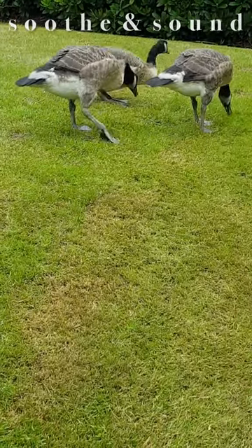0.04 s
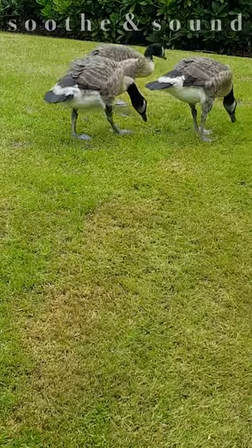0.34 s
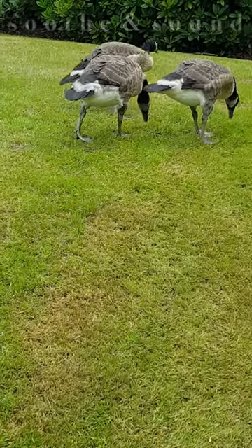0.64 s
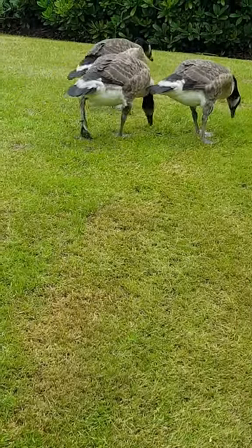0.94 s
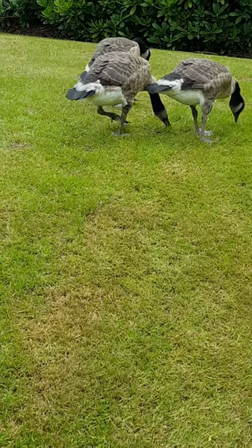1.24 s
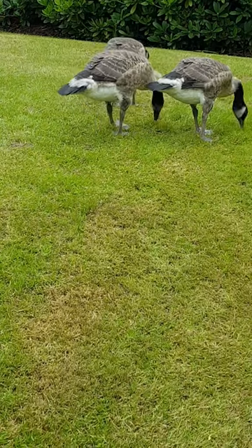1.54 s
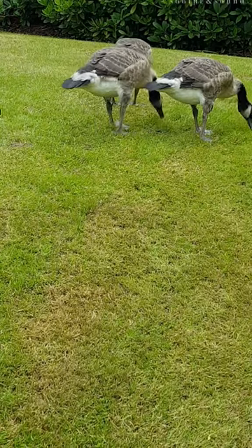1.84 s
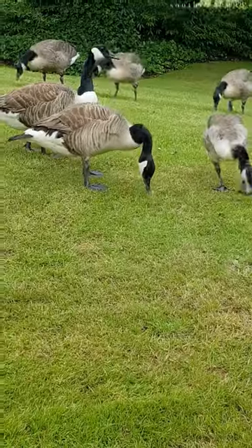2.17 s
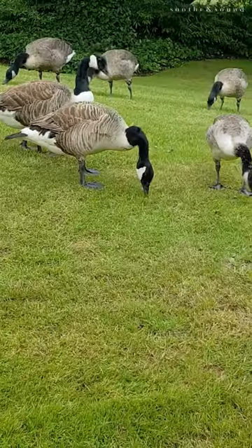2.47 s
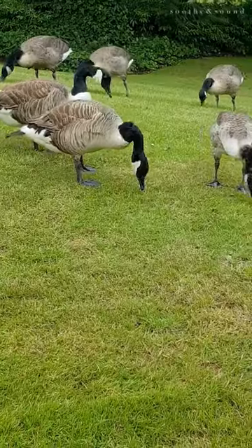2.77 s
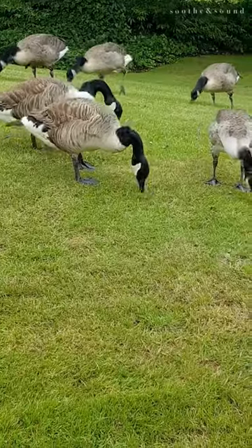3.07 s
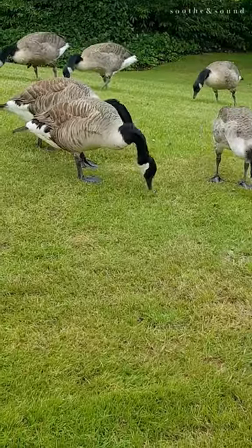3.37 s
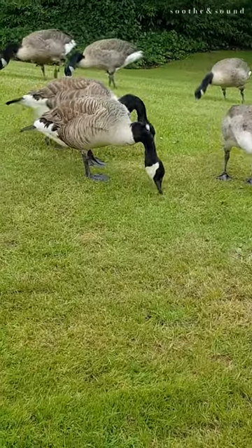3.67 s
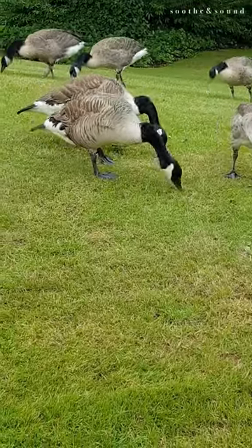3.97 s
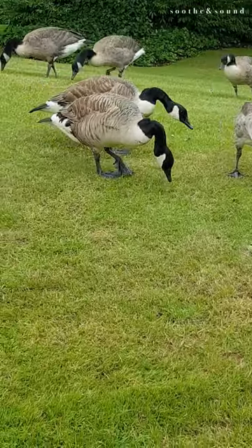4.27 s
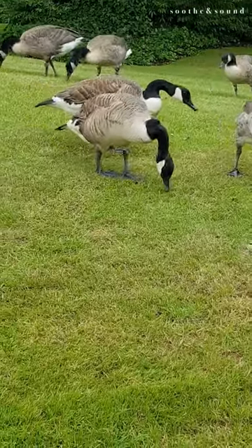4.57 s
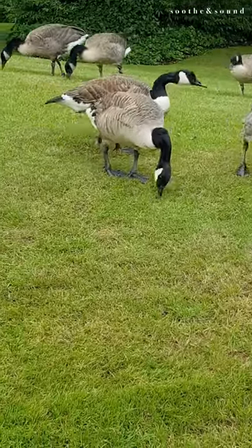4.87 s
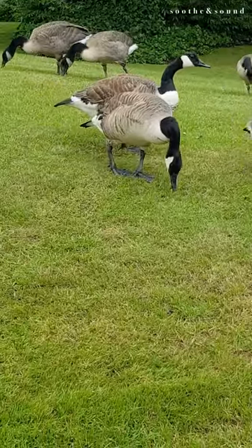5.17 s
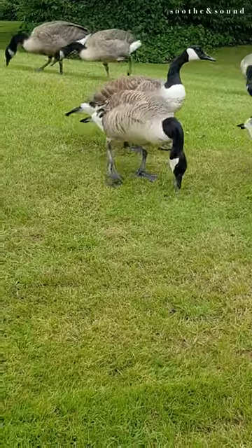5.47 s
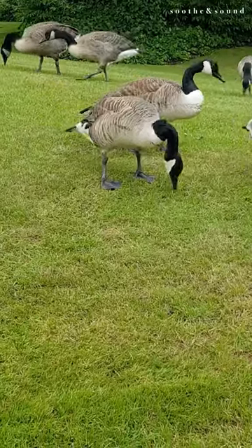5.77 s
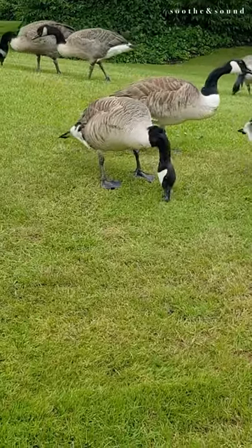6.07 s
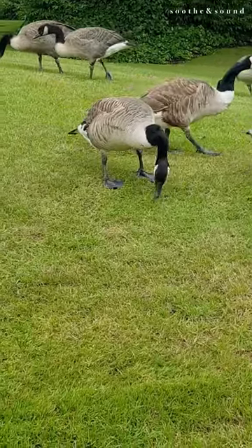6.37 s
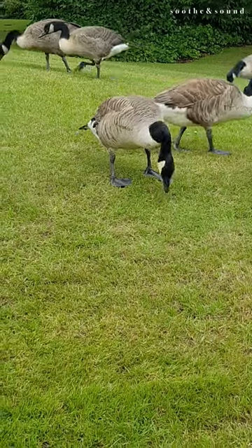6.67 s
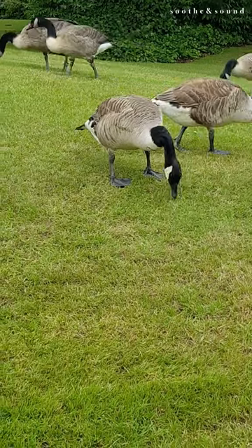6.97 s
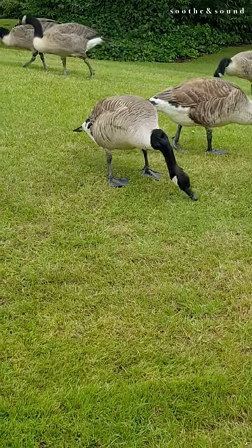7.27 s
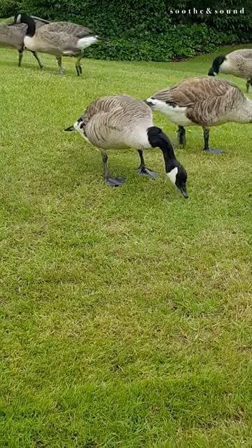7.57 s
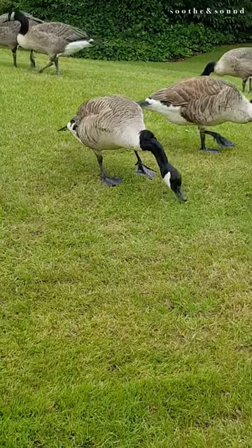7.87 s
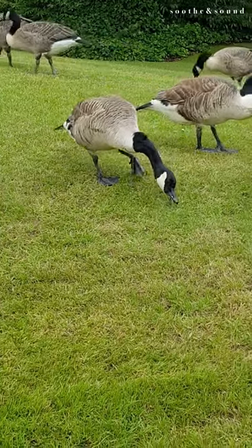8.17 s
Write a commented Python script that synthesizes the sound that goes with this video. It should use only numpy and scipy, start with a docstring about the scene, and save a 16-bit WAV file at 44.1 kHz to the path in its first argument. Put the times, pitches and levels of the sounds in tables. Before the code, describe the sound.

A soft, steady hiss of breeze in leaves fills an open lawn. Geese graze close by, tearing grass in brief, crisp bursts of tiny snaps over a faint crackle of nibbling. A distant songbird whistles a quiet phrase, and around the middle a small bird on the right gives a run of thin, high chirps, the loudest sound. The hiss then eases slightly. Everything is bright, with little bass.

```python
"""Geese graze on a lawn: bills tear the short grass in bursts of tiny snaps, feet pat the turf.
A breeze in the leaves makes a soft, steady hiss over a faint distant rush and rumble.
A small bird close by on the right gives a run of thin chirps; a songbird whistles far off among
the trees. Each bird note is one gliding tone. The sound is thin in the bass, bright in the treble."""
import sys
import numpy as np
from scipy import signal
from scipy.fft import rfft, irfft, next_fast_len
from scipy.io import wavfile
from scipy.ndimage import uniform_filter1d, map_coordinates

SR = 44100
rng = np.random.default_rng(int(sys.argv[2]) if len(sys.argv) > 2 else 0)


def file_out(sig):
    """Save sig as 16-bit WAV at sys.argv[1]."""
    # one column per channel
    cols = np.atleast_2d(sig).T
    # limit, then scale
    lim = np.clip(cols, -1, 1)
    pcm = np.round(lim * 32767).astype(np.int16)
    wavfile.write(sys.argv[1], SR, pcm)


N = 362924
SIDE = np.array([[.5], [-.5]])  # splits a left-minus-right difference between the channels


def amp(db):
    """Decibels to gain."""
    return 10 ** (np.asarray(db) / 20)


def unit(x):
    """Scale to rms 1."""
    return x / np.sqrt(np.mean(x ** 2) + 1e-20)


def along(points, hz):
    """Interpolate (frequency [Hz], value) points on a log axis."""
    knots_hz, values = np.transpose(points)
    return np.interp(np.log(hz + 1), np.log(knots_hz + 1), values)


def curve(points):
    """Interpolate (time [s], value) points at every sample."""
    return np.interp(np.arange(N) / SR, *np.transpose(points))


def progress(length_s):
    """Ramp from 0 to 1."""
    return np.linspace(0, 1, int(length_s * SR))


def wobble(rate_hz):
    """Smooth random curve, rate_hz knots a second."""
    knots = rng.standard_normal(int(N * rate_hz / SR) + 4)
    return map_coordinates(knots, [np.arange(N) * rate_hz / SR])


def filtered(x, response):
    """Apply a frequency response."""
    size = next_fast_len(N + SR // 4)
    return irfft(rfft(x, size) * response(np.fft.rfftfreq(size, 1 / SR)), size)[..., :N]


def add(track, start_s, sound):
    """Mix a sound into a track."""
    part = track[..., max(round(start_s * SR), 0):][..., :sound.shape[-1]]
    part += sound[..., :part.shape[-1]]


# Ambient field at the microphones: (frequency [Hz], left-right correlation [-1..1])
COHERENCE = [(60, -0.13), (130, 0.042), (300, 0.7), (650, 0.56), (1100, 0.17), (1500, -.15), (1900, -.33),
             (2500, -0.25), (3000, 0.076), (7000, -0.0014), (15000, .01)]


def diffuse_noise(spectrum, patchy_db):
    """Partly correlated stereo noise of rms 1; its gain varies in patches of time and frequency."""
    def mid_side_gains(hz):
        angle = np.arccos(np.clip(along(COHERENCE, hz), -1, 1)) / 2
        return amp(along(spectrum, hz)) * [np.cos(angle), np.sin(angle)]

    bins = signal.stft(rng.standard_normal((2, N)), nperseg=512)[2]
    patches = uniform_filter1d(rng.standard_normal(bins.shape[1:]), size=10, axis=0)
    patches = uniform_filter1d(patches, size=10, axis=1)
    pair = signal.istft(bins * amp(patchy_db * unit(patches)), nperseg=512)[1][:, :N]
    mid, side = filtered(pair, mid_side_gains)
    return unit(np.array([mid + side, mid - side]))


# Leaf hiss, distant rush and ground rumble: (frequency [Hz], relative density [dB])
HISS_SPECTRUM = [(300, -79), (1500, -39), (2500, -23), (3120, -12), (4300, -7.5), (5550, -3), (6600, 2),
                 (7300, 0), (8300, -.5), (9800, -5), (11300, -2), (13000, -6.5), (14500, -8.5),
                 (15600, -10.5)]
RUSH_SPECTRUM = [(30, -70), (100, -58), (200, -41.5), (300, -30), (500, -22.5), (1000, -14.5), (1500, -10),
                 (2000, -5), (2500, -4), (3200, -6), (4500, 1.5), (6000, -1.5), (9000, -28.5)]
RUMBLE_SPECTRUM = [(20, -30), (50, -25), (90, -8), (150, 0), (260, 0), (450, 4), (1000, -35)]
# Breeze and rumble envelopes: (time [s], level [dB])
BREEZE_LEVEL = [(0.0, -46.5), (1.15, -47.5), (1.44, -46.5), (2.01, -47.5), (4.19, -45.5), (4.44, -46.5),
                (5.13, -46.5), (5.41, -47), (8.23, -50.5)]
RUMBLE_LEVEL = [(0, -99), (.23, -89), (.4, -93), (.55, -88), (.66, -87), (1.0, -102), (1.3, -94),
                (2.15, -96.5), (3.5, -102), (4.0, -95), (4.35, -107), (5.2, -103), (5.6, -111),
                (8.23, -117)]


def breeze(hiss_over_db=2, rush_over_db=-9.5):
    """Leaves hiss all around, over a faint distant rush and a rumble at the ground."""
    breeze_db = curve(BREEZE_LEVEL)
    leaves = diffuse_noise(HISS_SPECTRUM, patchy_db=0.84)
    side_leaves = diffuse_noise(HISS_SPECTRUM, patchy_db=3.0)[0]
    right_db, left_lead_s = 1, 0.23e-3
    side_leaves = filtered(
        side_leaves, lambda hz: amp(-SIDE * right_db) * np.exp(2j * np.pi * hz * SIDE * left_lead_s))
    hiss = amp(breeze_db + hiss_over_db + 0.14 * wobble(16)) * (leaves + amp(-12.5) * side_leaves)
    rush_db = breeze_db + rush_over_db + 0.15 * wobble(6.1)
    rush = amp(rush_db) * diffuse_noise(RUSH_SPECTRUM, patchy_db=1.4)
    rumble = amp(curve(RUMBLE_LEVEL) + 2.9 * wobble(21)) * diffuse_noise(RUMBLE_SPECTRUM, patchy_db=1.0)
    return hiss + rush + rumble


# Foliage envelope: (time [s], level [dB])
RUSTLE_LEVEL = [(0, -64), (1.0, -67.5), (1.5, -65), (3.6, -66), (4.1, -58.5), (4.9, -62), (5.6, -63.5),
                (6.6, -63.5), (7.3, -73), (8.23, -72.5)]
# Foliage noise: (frequency [Hz], relative density [dB])
RUSTLE_SPECTRUM = [(1000, -40.5), (2000, -10.5), (2900, 0.5), (3600, 1), (5000, -9.5), (8000, -36)]


def rustle():
    """Nearby foliage stirs in the upper midrange."""
    return amp(curve(RUSTLE_LEVEL) + 0.94 * wobble(9)) * diffuse_noise(RUSTLE_SPECTRUM, patchy_db=3.0)


# Decay among the trees: (frequency [Hz], T60 [s])
TREE_DECAY = [(200, .4), (2000, 0.22), (10000, 0.18)]


def tree_echo(x):
    """Diffuse echo from hedge and trees; the treble dies first."""
    hz, t, bins = signal.stft(rng.standard_normal((2, SR // 2)), SR, nperseg=256)
    decay = amp(-60 * t / along(TREE_DECAY, hz)[:, None])
    tail = signal.istft(bins * decay, SR, nperseg=256)[1]
    return signal.fftconvolve(x[None], tail / np.linalg.norm(tail[0]), axes=1)[:, :N]


def direct_path(x, path):
    """A source reaches the microphones with phase and level differences that depend on frequency."""
    lead_rad, right_db = np.array(path)[:, [0, 1]], np.array(path)[:, [0, 2]]
    return filtered(
        x, lambda hz: np.exp(1j * SIDE * along(lead_rad, hz)) * amp(-SIDE * along(right_db, hz)))


def whistles(notes, waver, flutter_db, taper):
    """One swelling, fading tone per note: (time [s], pitch contour [Hz], level [dB], peak at [0..1])."""
    out, drift, flutter = np.zeros(N), wobble(300), wobble(160)
    for start_s, contour_hz, db, peak_at in notes:
        u = np.linspace(0, 1, len(contour_hz))
        samples = round(start_s * SR) + np.arange(len(u))
        hz = contour_hz * (1 + waver * drift[samples])
        tone = np.sqrt(2) * np.sin(2 * np.pi * np.cumsum(hz) / SR)
        swell = np.abs(np.sin(np.pi * np.interp(u, [0, peak_at, 1], [0, .5, 1]))) ** taper
        add(out, start_s, amp(db + flutter_db * flutter[samples]) * swell * tone)
    return out


# Songbird glides: (time [s], length [s], start pitch [Hz], end pitch [Hz], level [dB])
FAR_NOTES = [ (0.043, 0.035, 3440, 3300, -57), (2.464, .022, 2360, 1900, -54),
             (2.850, 0.2, 1780, 2000, -72), (3.110, 0.15, 2160, 2050, -62),
             (3.130, 0.088, 2900, 2685, -55.5), (3.205, 0.083, 3020, 2920, -61.5),
             (3.293, .190, 1844, 2160, -62), (3.480, 0.1, 2180, 1815, -61), (3.580, 0.11, 1850, 1787, -64),
             (3.690, 0.07, 1950, 1640, -64), (3.670, 0.091, 2980, 2760, -65),
             (3.870, .036, 2800, 2580, -58), (3.878, .016, 3300, 3480, -54),
             (3.915, .075, 2710, 2900, -57.5), (4.295, 0.13, 2610, 2950, -65),
             (5.290, .076, 2290, 2030, -63.5), (5.490, .130, 2380, 2300, -67),
             (5.630, .230, 2280, 2330, -67.5)]
# Songbird to microphones: (frequency [Hz], left lead [rad], right over left [dB])
FAR_PATH = [(1960, 2.67, -0.87), (2280, 1.1, -1), (2800, .3, -0.92)]


def far_bird(peak_at=0.39):
    """A fluting phrase, softened by the trees."""
    notes = [(start_s, from_hz + (to_hz - from_hz) * progress(length_s), db, peak_at)
             for start_s, length_s, from_hz, to_hz, db in FAR_NOTES]
    voice = whistles(notes, waver=0.017, flutter_db=3.4, taper=0.5)
    return amp(-2.0) * direct_path(voice, FAR_PATH) + amp(-6.5) * tree_echo(voice)


# Near bird's arched chirps: (time [s], top pitch [Hz], level [dB])
ARCH_NOTES = [(3.883, 6540, -36), (4.179, 7100, -35.5), (4.482, 7070, -37.5)]


def arches(length_s=.038, foot_hz=5580, skew=1.55, peak_at=0.83):
    """Notes that climb to their top pitch and drop back faster."""
    hump = np.sin(np.pi * progress(length_s) ** skew)
    return [(start_s, foot_hz + (top_hz - foot_hz) * hump, db, peak_at)
            for start_s, top_hz, db in ARCH_NOTES]


# Near bird's ticks: (time [s], centre pitch [Hz], sweep [Hz], level [dB])
TICK_NOTES = [(3.582, 8940, -1800, -36.5), (3.964, 6590, -700, -34.5), (3.968, 6500, 1100, -33),
              (3.980, 6820, -1200, -29.5), (4.261, 6340, 800, -34), (4.568, 7000, 400, -35)]


def ticks(length_s=0.0053, peak_at=.5):
    """Very short linear sweeps."""
    return [(start_s, centre_hz + sweep_hz * (progress(length_s) - .5), db, peak_at)
            for start_s, centre_hz, sweep_hz, db in TICK_NOTES]


# Near bird's slurs: (time [s], length [s], start pitch [Hz], slow fall [Hz], final drop [Hz],
# drop length [s], level [dB], peak at [0..1])
SLUR_NOTES = [ (4.677, 0.11, 6900, 271, 450, .014, -37.5, 0.83),
              (4.945, 0.042, 8980, 596, 500, 0.012, -41.5, 0.8),
              (5.04, .148, 6850, 781, 700, 0.017, -41, .35),
              (5.256, .050, 6480, -1, 1470, .038, -38.5, 0.1)]


def slurs():
    """Notes that sink and level off, then flick down in a steepening drop."""
    notes = []
    for start_s, length_s, from_hz, fall_hz, drop_hz, drop_s, db, peak_at in SLUR_NOTES:
        remaining = 1 - progress(length_s)
        fall = 1 - remaining ** 2
        drop = np.clip(1 - remaining * length_s / drop_s, 0, 1) ** 1.3
        notes.append((start_s, from_hz - fall_hz * fall - drop_hz * drop, db, peak_at))
    return notes


# Near bird to microphones: (frequency [Hz], left lead [rad], right over left [dB])
NEAR_PATH = [(5270, -1.5, 1), (5900, 1.4, -2), (6430, 0.7, 2.5), (6600, 2.5, 1), (7500, 4.5, 2),
             (8360, 8, 0)]


def near_bird(highpass_hz=3500):
    """Thin chirps from the right, nearly dry."""
    voice = whistles(arches(), waver=0.0032, flutter_db=1.5, taper=0.54)
    voice += whistles(ticks() + slurs(), waver=0.0014, flutter_db=1.7, taper=0.36)
    voice = filtered(voice, lambda hz: 1 / (1 + (highpass_hz / (hz + 1)) ** 8))
    return amp(-3) * direct_path(voice, NEAR_PATH) + amp(-17.5) * tree_echo(voice)


# Goose steps: (time [s], level [dB], pitch [Hz], rise [cycles])
STEPS = [(.222, -71, 350, 0.71), (.466, -76, 300, 0.71), (.635, -77, 270, .9), (.660, -87, 110, .6),
         (.945, -91, 125, .5), (1.160, -80, 120, 0.19), (1.326, -84, 165, .7)]


def footsteps():
    """The turf gives under a foot: a dull swing that builds and dies within a few cycles."""
    out, t = np.zeros(N), np.arange(SR // 8) / SR
    for start_s, db, hz, rise_cycles in STEPS:
        age = hz * t / rise_cycles
        add(out, start_s, amp(db) * np.sin(2 * np.pi * hz * t) * age * np.exp(1 - age))
    return out


# Bills tearing grass: (time [s], length [s], level [dB], band centre [Hz])
GRASS_TEARS = [(0.388, 0.046, -47.5, 8900), (1.347, 0.038, -53, 10000), (1.488, .05, -58, 6500),
               (1.658, 0.09, -53, 7500), (1.933, 0.028, -48, 10000), (2.712, .025, -53, 9000),
               (3.796, .03, -52, 8500), (4.33, 0.014, -52, 9000), (4.888, 0.045, -49.5, 7650)]


def grazing(nibbles_per_s=160, nibbles_over_breeze_db=-16.5):
    """A tuft stretches and its blades snap faster and faster; small nibbles crackle throughout."""
    tears = np.zeros((2, N))
    for start_s, length_s, db, hz in GRASS_TEARS:
        stretch = progress(length_s)
        snaps = rng.standard_normal((2, len(stretch))) * (rng.random(len(stretch)) < .08 * stretch)
        snaps = np.pad(snaps, ((0, 0), (0, SR // 200)))  # room to ring out
        blade_band = signal.butter(2, [hz * 0.74, hz * 1.23], "band", fs=SR)
        add(tears, start_s, amp(db) * unit(signal.lfilter(*blade_band, snaps)))
    clicks = rng.standard_normal((2, N)) * (rng.random(N) < nibbles_per_s / SR)
    colour = [(100, -60.0), (3000, 0.5), (7000, -3.5), (15000, -3.0)]  # (frequency [Hz], gain [dB])
    nibbles = unit(filtered(clicks, lambda hz: amp(along(colour, hz))))
    return tears + amp(curve(BREEZE_LEVEL) + nibbles_over_breeze_db) * nibbles


def scene():
    """Breeze, birds and geese on the lawn, in stereo."""
    return breeze() + rustle() + far_bird() + near_bird() + footsteps() + grazing()


# Microphone mismatch: (frequency [Hz], left over right [dB])
MIC_BALANCE = [(100, 1.5), (1400, 0.5), (2000, 1.3), (3500, 1), (4500, -1), (5700, -2), (6400, -5.5),
               (7200, -2.5), (8600, 0), (9600, -2.5), (11200, -4.5), (12800, -3), (14300, -1)]


def record(dry, cutoff_hz=15750):
    """Each microphone adds its own colour; nothing passes above the cutoff."""
    return filtered(dry, lambda hz: amp(SIDE * along(MIC_BALANCE, hz)) * (hz < cutoff_hz))


dry = scene()
out = record(dry)
file_out(out)
```